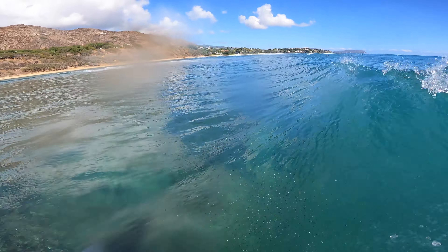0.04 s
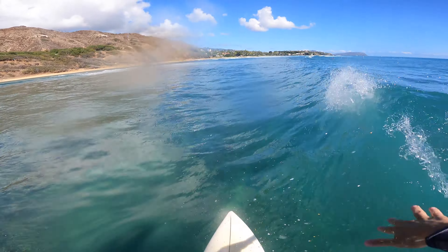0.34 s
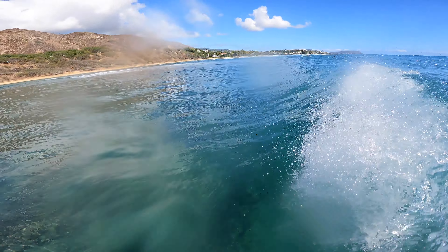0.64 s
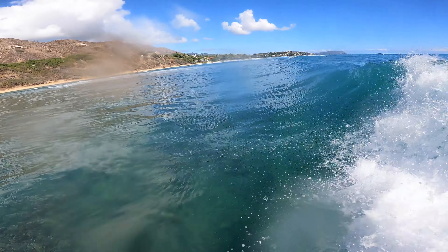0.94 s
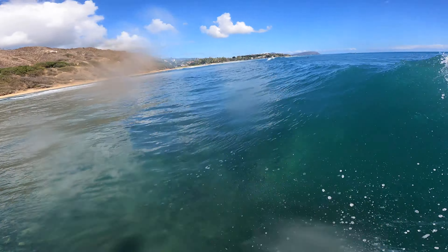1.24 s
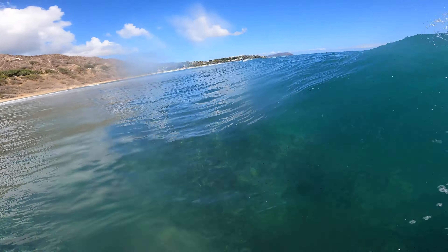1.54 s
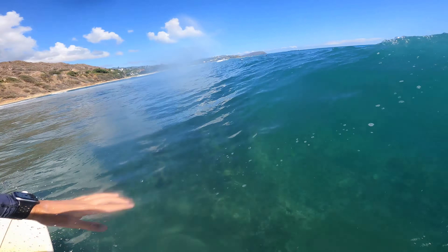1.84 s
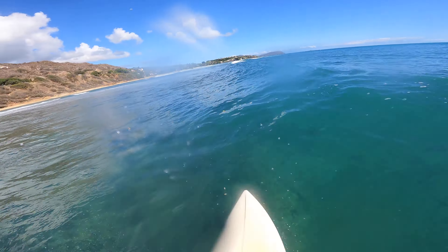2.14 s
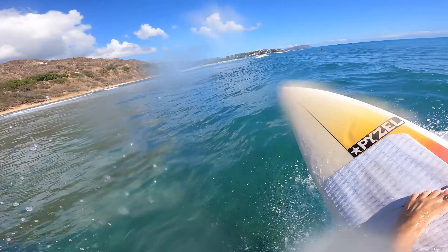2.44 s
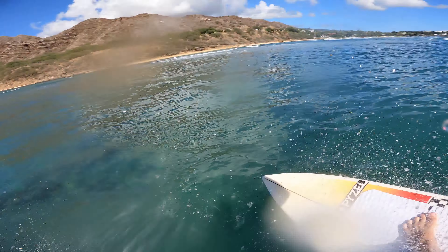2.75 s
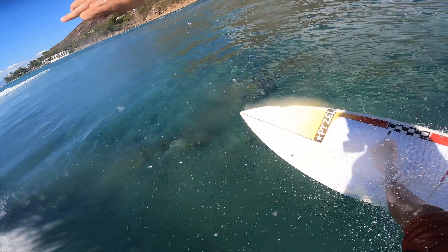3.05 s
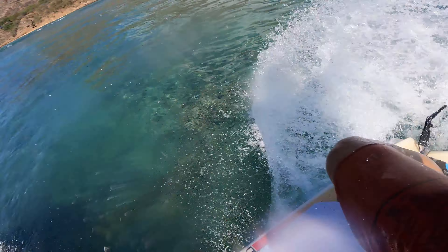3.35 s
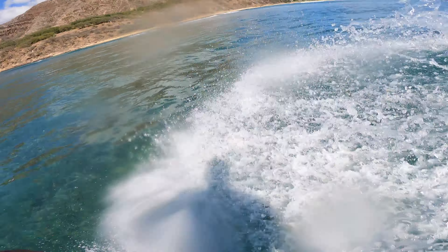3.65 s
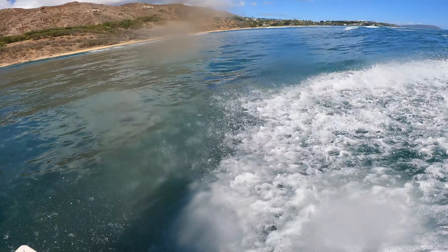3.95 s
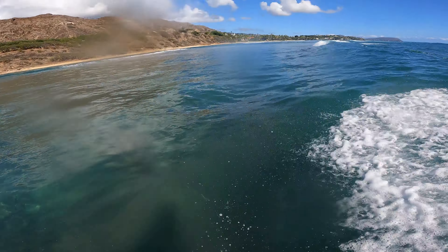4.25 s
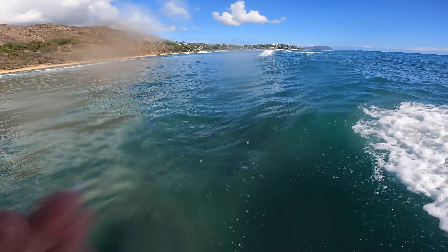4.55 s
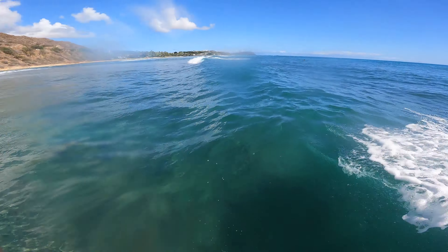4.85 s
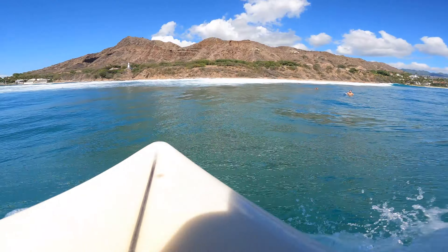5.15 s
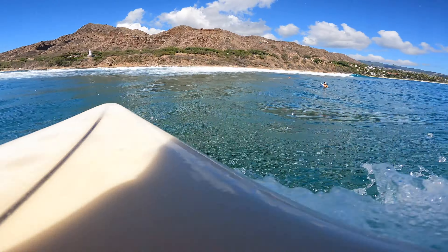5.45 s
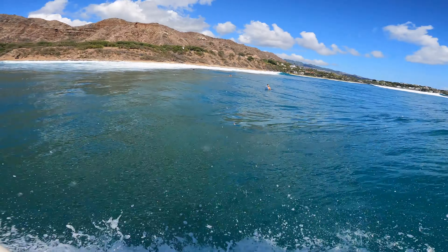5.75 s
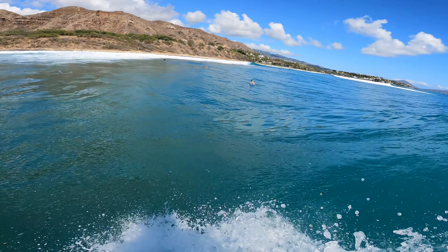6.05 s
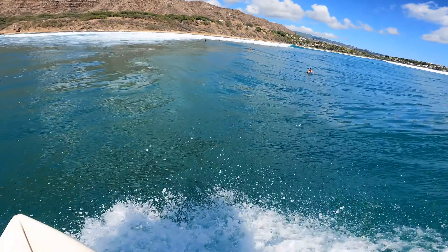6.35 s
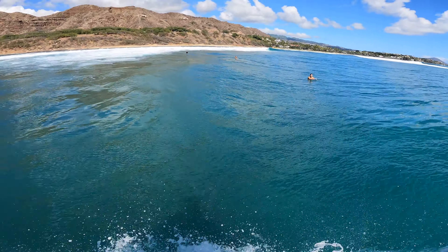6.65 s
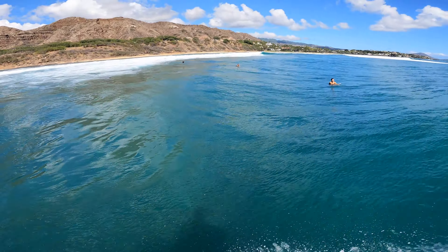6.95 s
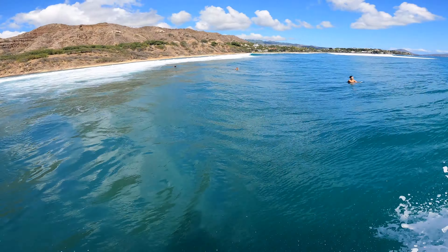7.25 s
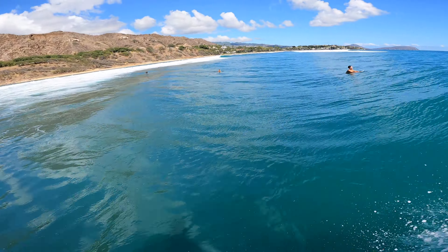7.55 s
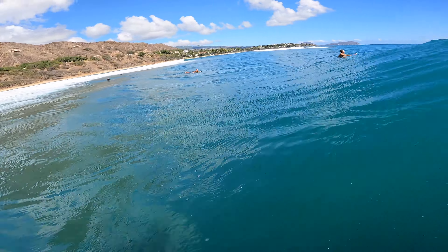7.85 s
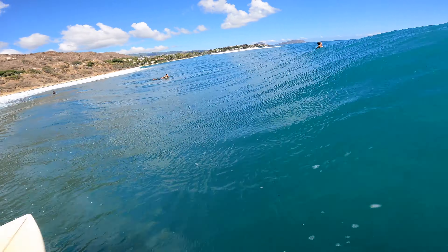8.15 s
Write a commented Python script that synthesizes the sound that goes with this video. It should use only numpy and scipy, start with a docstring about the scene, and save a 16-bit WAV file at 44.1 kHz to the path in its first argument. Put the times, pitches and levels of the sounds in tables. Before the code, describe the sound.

Churning water and rumbling wind roar close against a wet camera microphone as a surfboard rides a breaking wave. At first chop slaps and gulps under the board and drops tick on the housing. Spray hisses up in swells with the turns, over a faint fizz of foam. After a brief dead silence past the middle, the roar resumes with a few more slaps, and soft, deep wind booms carry on to the end.

```python
"""A surfer rides a breaking wave, heard through the wet microphone port of an action camera.
At first chop slaps the board, trapped air resonates and drops tick on the housing, over the turbulent
roar of wake and wind. The hiss of spray then swells with the turns or briefly drops away, and foam fizzes.
Near 5 s comes a short silent cut. The ride resumes with a few more slaps, the fizz dies away, and
eddies of wind boom on the microphone to the end. Throughout, the wet port muffles and colours the treble."""
import sys
import numpy as np
from scipy import signal
from scipy.fft import rfft, irfft
from scipy.io import wavfile
from scipy.ndimage import uniform_filter1d

SR = 44100
rng = np.random.default_rng(int(sys.argv[2]) if len(sys.argv) > 2 else 0)


def generate_wav(signal):
    """Clip the signal to [-1, 1] and save it as 16-bit WAV at the path in sys.argv[1]."""
    frames = np.transpose(np.atleast_2d(signal))
    scaled = np.clip(frames, -1, 1) * 32767
    pcm = np.round(scaled).astype(np.int16)
    wavfile.write(sys.argv[1], SR, pcm)


N = 361619
TIME = np.arange(N) / SR
BINS = np.fft.rfftfreq(N, 1 / SR)
FRAMES = dict(nperseg=512, noverlap=384)


# steady glide in each shot: (wind level [dB], water level [dB], spray level [dB])
FIRST_LEVELS = (-19.5, -24, -38)
SECOND_LEVELS = (-19, -20.5, -33)
# the board drives into the face and speeds up:
# (peak time [s], build time [s], wind gain [dB], water gain [dB])
BOARD_DRIVES = [(0.41, 0.28, 3, 3.5), (1.11, 0.28, 3.5, 6.5), (1.87, 0.096, -2, 5.5), (2.04, 0.19, 3, 2.5),
                (2.27, 0.16, -1, 3.5), (2.73, 0.12, 1, 2.5), (3.19, 0.086, 5, 4.5), (3.4, 0.27, 1, 4.5),
                (3.97, 0.24, 0, 3.5), (4.28, 0.13, 2.5, 2), (4.85, 0.24, 2, 1.5), (5.99, 0.085, 2, 1.5),
                (7.05, 0.22, 3, -1), (7.65, 0.33, 2.5, 0.5)]
# the board slows or skips clear of the water:
# (deepest time [s], build time [s], wind drop [dB], water and spray drop [dB])
BOARD_LULLS = [(0.122, 0.0092, 17, 2.5), (0.21, 0.028, 1, 1), (0.3, 0.049, 3, 2.5), (0.6, 0.051, 4, 1.5),
               (0.66, 0.045, 3.5, -0.5), (0.735, 0.022, 6, 3), (1.29, 0.14, -0.5, 2), (1.4, 0.072, 1, 1.5),
               (2.44, .06, 3.5, 2), (2.85, 0.062, 3.5, 0.5), (5.6, 0.3, 4.5, -1), (5.69, 0.059, -2, 6.5),
               (7.2, 0.16, 5.5, -1)]
# the hiss of spray swells or briefly drops away:
# (centre time [s], build time [s], gain [dB], extra fine-mist gain [dB])
SPRAY_CHANGES = [(0.16, 0.34, 3, 2), (0.46, 0.091, -1, 3), (0.73, 0.095, 3.5, 0), (0.97, 0.44, 9, -3),
                 (1.04, .07, 1.5, -0.5), (1.55, 0.083, 2, 1.5), (1.96, 0.18, 7, -1.5),
                 (2.37, 0.27, 4.5, -1.5), (2.68, 0.25, 0, 5), (2.82, .04, -3, 1), (3.12, 0.068, 3, 0),
                 (3.23, .04, 0.5, 2.5), (3.33, 0.021, 7.5, -9), (3.51, 0.033, 1, 3), (3.62, 0.2, 3, 0.5),
                 (3.88, 0.28, 7, -2), (4.55, .3, -1, -1.5), (5.14, 0.08, -5.5, 0), (5.28, 0.075, 2.5, -2),
                 (5.54, 0.077, 2, -4.5), (5.81, 0.077, 3, 3.5), (5.97, .1, -1, -1), (6.5, 0.2, 0.5, 3.5),
                 (8.15, 0.046, 4, -4)]

def ride(glide, port, mist_hz=3800):
    """Flow noise grows with speed: wind, wake and spray swell and ease about a steady glide."""
    wind_db, water_db, spray_db = glide
    rush_db, wake_db = swells(BOARD_DRIVES)
    calm_db, skip_db = swells(BOARD_LULLS)
    hiss_db, mist_db = swells(SPRAY_CHANGES)
    surge = wander(37)  # lifts the spray as it dips the wake
    roar = gain_of(wind_db + rush_db - calm_db) * wind(port)
    roar += gain_of(water_db + wake_db - skip_db) * wake(port, surge)
    hiss = spray(port, surge)
    coarse = irfft(rfft(hiss) * below(mist_hz), N)
    fine = gain_of(mist_db) * (hiss - coarse)
    varying_hiss = gain_of(spray_db + hiss_db - skip_db) * (coarse + fine)
    return gain_of(-clearing_db()) * roar + water_film(varying_hiss)


def wind(port):
    """Turbulent pressure fluctuations buffet the microphone with a low rumble."""
    return shaped(turbulence(patchy_db=0.14), port * np.sqrt(below(342)))


def wake(port, surge, surge_db=-0.24):
    """Bubble resonance: large air pockets gulp in the churning water under the board."""
    churn = turbulence(patchy_db=1.6)
    pockets = gain_of(-13.5) * bubbles(302, 1372, per_s=700, cycles=3.9, spread_db=0.83)
    band = np.sqrt((1 - below(352)) * below(994, order=20))
    return shaped((churn + pockets) * gain_of(surge_db * surge), port * band)


def spray(port, surge, surge_db=1.0):
    """Many tiny impacts add incoherently: mist hisses and droplets patter back on the sea."""
    mist = turbulence(patchy_db=1.46)
    droplets = gain_of(-9.5) * bubbles(1300, 7000, per_s=2700, cycles=4.4, spread_db=2.5)
    band = np.sqrt((1 - below(998, order=20)) * below(9700, order=16))
    return shaped((mist + droplets) * gain_of(surge_db * surge), port * band)


# chop slapping the board and trapping air:
# (time [s], relative level [dB], pitch [Hz], length [s], ringing share of power [0-1])
CHOP_SLAPS = [(0.032, -12.5, 540, .015, 0.8), (0.041, -10, 188, 0.017, 1), (0.079, -9.5, 286, 0.011, 0.75),
              (0.157, -13, 560, 0.027, 0), (0.171, -21.5, 1135, 0.013, 0.85),
              (0.252, -12.5, 281, 0.025, 0.95), (0.318, -15.5, 152, 0.021, 0.6),
              (0.373, -15, 516, 0.011, 0.7), (0.398, -16.5, 150, 0.021, 0.55),
              (0.404, -16.5, 429, 0.033, 0.8), (0.449, -16.5, 200, 0.022, 1), (0.532, -17, 590, 0.024, 0.2),
              (0.665, -14, 610, 0.014, 0.6), (0.775, -13.5, 570, 0.025, 0), (0.798, -21, 1030, 0.014, 0.5),
              (1.083, -13.5, 398, .04, .2), (1.327, -13, 502, 0.024, 0.1), (2.589, -14, 274, 0.027, 0.88),
              (2.795, -14, 602, 0.017, 0.55), (2.92, -12.5, 215, 0.026, 0.3), (3.14, -14, 288, 0.02, 0.83),
              (3.172, -12.5, 184, 0.053, 0.8), (3.34, -14.5, 642, 0.022, 0.78), (3.389, -16, 633, .017, 1),
              (3.433, -12.5, 348, 0.021, 0.2), (3.661, -15.5, 496, 0.011, 0.9),
              (4.163, -13.5, 380, 0.01, 0.2), (4.598, -16, 468, .011, 0.4), (5.134, -16.5, 430, .016, 0.55),
              (5.625, -13, 774, 0.017, 0.5), (5.631, -16.5, 1154, 0.012, 0.4),
              (5.643, -15, 266, 0.023, 0.96), (5.739, -17, 533, 0.013, 1)]

def slaps(level_db=-2, muffle_hz=1000):
    """Impacts of chop on the board, dulled by the wet port acting as a low-pass filter."""
    out = np.zeros(N)
    for s, db, hz, length, ring in CHOP_SLAPS:
        add(out, s, gain_of(db) * impact(hz, length, ring, octaves=1.0, rise=0.0023))
    muffle = signal.butter(3, muffle_hz, fs=SR, output="sos")
    return gain_of(level_db) * signal.sosfilt(muffle, out)


def clearing_db(depth_db=1, span_s=0.084):
    """Displacement: each slap throws water clear of the board, so the roar eases around it."""
    eased = np.zeros(N)
    dip = signal.windows.hann(round(span_s * SR))
    for s, _, _, length, _ in CHOP_SLAPS:
        add(eased, s + length - span_s / 2, dip)
    return depth_db * np.minimum(eased, 1)


# eddies of wind on the microphone: (time [s], level [dB], pitch [Hz], length [s])
WIND_EDDIES = [(1.065, -21, 70, 0.033), (1.952, -18, 61, 0.074), (4.76, -21, 89, 0.092),
               (5.994, -21.5, 54.9, .13), (6.194, -22, 49.7, 0.073), (6.486, -27, 50.2, 0.087),
               (6.681, -27, 58, 0.12), (7.076, -22, 59.3, 0.058), (7.212, -26, 57.2, 0.081),
               (8.098, -22, 124, .1)]

def gusts():
    """The pressure swing of each passing eddy makes a soft, deep boom."""
    out = np.zeros(N)
    for s, db, hz, length in WIND_EDDIES:
        add(out, s, gain_of(db) * burst(hz, length, octaves=0.76, rise=0.054))
    return out


# drops and longer spatters on the housing:
# (time [s], peak level [dB], pitch [Hz], length [s], ringing share of power [0-1])
HOUSING_DROPS = [(0.352, -46, 4600, 0.0055, 0.93), (0.41, -31, 1920, .006, 0.2),
                 (0.425, -56, 5000, .014, 0), (0.509, -51, 4400, .005, 0.1), (0.53, -39, 3000, .005, 0),
                 (0.591, -34, 3000, 0.0037, 0), (2.625, -35, 2500, .045, 0.03),
                 (2.687, -32.5, 1900, .045, 0.07), (2.736, -37, 2150, 0.026, 0),
                 (3.41, -33.5, 2640, 0.006, 0.15), (5.629, -50, 4000, 0.009, 0)]

def drops():
    """Small impacts tick on the housing, and plink where a trapped bubble resonates."""
    out = np.zeros(N)
    for s, db, hz, length, ring in HOUSING_DROPS:
        tick = impact(hz, length, ring, octaves=0.69, rise=0.0016)
        add(out, s, gain_of(db) * tick / abs(tick).max())
    return out


# patches of foam near the port: (peak time [s], build time [s], level [dB])
FOAM_PATCHES = [(0.15, 0.18, -67), (0.851, 0.5, -65.5), (1.58, 0.22, -63), (1.95, 0.15, -60),
                (2.8, 0.17, -68.5), (3.02, .12, -67.5), (3.9, 0.44, -67.5), (4.68, 0.32, -68),
                (5.95, .15, -87)]
# larger bubbles popping on the port: (time [s], level [dB])
FOAM_POPS = [(0.05, -43), (0.064, -57), (0.119, -56), (0.35, -60), (0.429, -54)]
# the port's high resonance: (frequency [Hz], relative gain [dB])
PORT_RESONANCE = [(10000, -45), (11200, -19), (12000, -4), (12800, 0), (14000, -5), (15700, -12)]

def fizz(floor_db=-84.5, pop_decay_s=0.002):
    """Bursting foam excites the port's treble resonance; the powers of patches and pops add."""
    grains = rng.standard_normal(N) * gain_of(1.8 * wander(150))
    power = sum(gain_of(db) ** 2 * swell(peak, build) for peak, build, db in FOAM_PATCHES)
    power += gain_of(floor_db) ** 2 * gate(*SHOT_SPANS[0])
    for s, db in FOAM_POPS:
        add(power, s, gain_of(db) ** 2 * np.exp(-TIME[:SR // 10] / pop_decay_s))
    return np.sqrt(power) * shaped(grains, response(PORT_RESONANCE))


# the film of water on the port: (time [s], notch frequency [Hz], notch depth [dB],
# resonance frequency [Hz], resonance gain [dB], resonance width [Hz])
FILM_STATES = [(0.35, 2630, 11, 3330, -2, 350), (0.75, 2970, -1.5, 3400, 1.5, 330),
               (1.05, 2830, 1.5, 3350, -1.5, 330), (1.5, 2720, 4.5, 3350, 6, 330),
               (2.0, 2760, 2.5, 3380, 4.5, 330), (2.4, 2760, 4, 3580, 4.5, 330),
               (2.68, 2840, 7, 3500, 8.5, 330), (2.9, 2710, 10, 3500, 2, 380),
               (3.12, 2820, -1.5, 3600, 5, 330), (3.33, 2740, 10, 3720, 4, 330),
               (3.65, 2690, 7.5, 3850, 8, 320), (4.5, 2910, 0.5, 4020, 0.5, 250),
               (5.2, 2720, 3.5, 3550, 1, 300), (6.0, 2600, 3, 3830, 4, 220), (6.5, 2650, 2, 4000, 7, 200),
               (7.2, 2750, 2.5, 3900, 5, 170), (7.9, 2910, 1, 3980, 1.5, 170)]

def water_film(x, notch_width_hz=260):
    """Absorption and resonance: the sliding film swallows one pitch and rings at a higher one."""
    hz, t, spectrum = signal.stft(x, SR, **FRAMES)
    s, *columns = np.transpose(FILM_STATES)
    notch_hz, depth_db, ring_hz, ring_db, ring_width_hz = (np.interp(t, s, c) for c in columns)
    notch = depth_db * np.exp(-((hz[:, None] - notch_hz) / notch_width_hz) ** 2)
    ring = ring_db * np.exp(-((hz[:, None] - ring_hz) / ring_width_hz) ** 2)
    return signal.istft(spectrum * gain_of(ring - notch), **FRAMES)[1][:N]


def turbulence(patchy_db):
    """Intermittency: noise varies in small patches of time and pitch as eddies come and go."""
    spectrum = signal.stft(rng.standard_normal(N), **FRAMES)[2]
    patches = uniform_filter1d(rng.standard_normal(spectrum.shape), 7, axis=1)  # along time
    patches = unit_rms(uniform_filter1d(patches, 5, axis=0))  # along frequency
    return unit_rms(signal.istft(spectrum * gain_of(patchy_db * patches), **FRAMES)[1][:N])


def bubbles(low_hz, high_hz, per_s, cycles, spread_db, sizes=24):
    """Damped oscillators: bubbles of many sizes form at random and rise in pitch as they die."""
    out = np.zeros(N)
    for hz in np.geomspace(low_hz, high_hz, sizes):
        age = np.arange(0, 5, hz / (cycles * SR))  # in decay times
        ring = np.exp(-age) * np.sin(2 * np.pi * cycles * age * (1 + 0.025 * age))
        strength = gain_of(spread_db * np.minimum(rng.exponential(1, N), 4))
        births = strength * (rng.random(N) < per_s / sizes / SR)
        out += np.sqrt(hz) * unit_rms(signal.oaconvolve(births, ring)[:N])
    return unit_rms(out)


def impact(hz, length, ring, octaves, rise):
    """Landing water divides its power between a noisy smack and the ring of the air it traps."""
    smack = np.sqrt(1 - ring) * burst(hz, length, octaves, rise)
    return smack + 2 * np.sqrt(ring) * air_pocket(hz, length)


def air_pocket(hz, length, glide=0.048, rise=0.0025):
    """Trapped air is a spring against the water's mass: it rings briefly, rising in pitch."""
    t = np.arange(round(2.5 * length * SR)) / SR
    turns = hz * t * (1 + glide * (t / length - 1)) + rng.random()
    return np.sin(2 * np.pi * turns) * envelope(t, rise, length)


def burst(hz, length, octaves, rise):
    """A transient of band-limited noise, with the energy of rms 1 over its length."""
    t = np.arange(round(2.5 * length * SR)) / SR
    edges = np.clip(hz * 2 ** (np.array([-0.5, 0.5]) * octaves), 20, 0.45 * SR)
    band = signal.butter(4, edges, "band", fs=SR, output="sos")
    puff = signal.sosfilt(band, rng.standard_normal(SR))[-len(t):] * envelope(t, rise, length)
    return puff / np.sqrt(np.sum(puff ** 2) / (length * SR))


def envelope(t, rise, length):
    """Smooth onset and bell-shaped decay of a transient."""
    return (1 - np.exp(-(t / rise) ** 2)) * np.exp(-(t / length) ** 2)


def swell(peak, build, release_share=0.68):
    """Asymmetric envelope: a smooth rise to 1 and a quicker fall."""
    width = np.where(TIME < peak, build, build * release_share)
    return np.exp(-((TIME - peak) / width) ** 2)


def swells(rows):
    """Gains in decibels add: one summed curve for each gain column."""
    return sum(np.outer(gains_db, swell(peak, build)) for peak, build, *gains_db in rows)


def wander(hz):
    """Random modulation of rms 1, low-passed at hz."""
    return shaped(rng.standard_normal(N), np.sqrt(below(hz, order=4)))


def gate(start, end, fade_s=0.0035):
    """Gating: a quick fade in and a dead stop."""
    return np.clip((TIME - start) / fade_s, 0, 1) * (TIME < end)


def response(points):
    """Frequency response interpolated on a logarithmic axis."""
    hz, db = np.transpose(points)
    return gain_of(np.interp(np.log(BINS + 1), np.log(hz + 1), db))


def below(hz, order=8):
    """Power response of a soft low-pass crossover."""
    return 1 / (1 + (BINS / hz) ** order)


def shaped(x, gain):
    """Spectral filtering, scaled to rms 1."""
    return unit_rms(irfft(rfft(x) * gain, N))


def unit_rms(x):
    """Normalisation to rms 1."""
    return x / np.sqrt(np.mean(x ** 2) + 1e-20)


def gain_of(db):
    """Decibels to amplitude ratio."""
    return 10 ** (np.asarray(db) / 20)


def add(mix, s, sound):
    """Superposes a sound on the mix at time s."""
    part = mix[max(round(s * SR), 0):][:len(sound)]
    part += sound[:len(part)]


# the two shots: (start time [s], end time [s])
SHOT_SPANS = [(0, 4.98), (5.114, 8.2)]
# spectrum of the ride through the wet port in each shot: (frequency [Hz], relative gain [dB])
FIRST_PORT = [(15, -8.5), (60, 1.5), (170, 1), (380, -2.5), (600, -2.5), (770, -7), (900, -12),
              (1100, -17.5), (1750, -31), (2120, -33), (2750, -40.5), (3750, -48), (4500, -58),
              (5400, -64.5), (7300, -68), (9000, -85)]
SECOND_PORT = [(15, -2.5), (58, -1), (110, -3.5), (330, -4), (680, -8.5), (1150, -15.5), (1750, -33.5),
               (2100, -37.5), (2600, -43.5), (4000, -52), (4400, -62), (5700, -68), (7500, -77),
               (10000, -96.5)]

def scene():
    """Superposition: all sources add in one channel, gated into two successive shots."""
    first, second = (gate(*span) for span in SHOT_SPANS)
    sea = first * ride(FIRST_LEVELS, response(FIRST_PORT))
    sea += second * ride(SECOND_LEVELS, response(SECOND_PORT))
    details = fizz() + slaps() + drops() + gusts()
    return (sea + (first + second) * details)[None]


def record(dry, threshold_db=-14.5, squeeze=0.55, cutoff_hz=15750):
    """Compression and band limiting: the camera eases its loudest moments, then cuts the top treble."""
    window = signal.windows.hann(1323)[None]  # 30 ms
    power = signal.oaconvolve(dry ** 2, window / window.sum(), "same")
    over_db = np.maximum(10 * np.log10(abs(power) + 1e-12) - threshold_db, 0)
    compressed = dry * gain_of(-squeeze * over_db)
    low_pass = signal.firwin(511, cutoff_hz, window=("kaiser", 9), fs=SR)[None]
    return signal.oaconvolve(compressed, low_pass, "same")


dry = scene()
out = record(dry)
generate_wav(out)
```